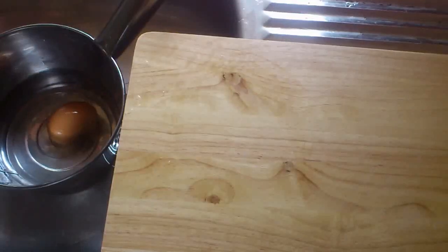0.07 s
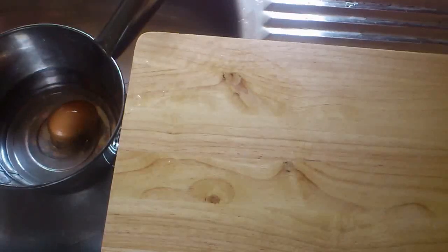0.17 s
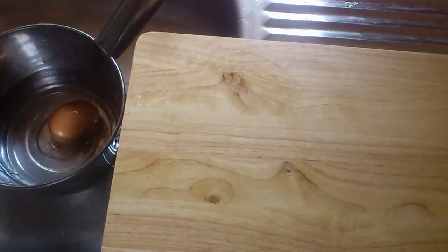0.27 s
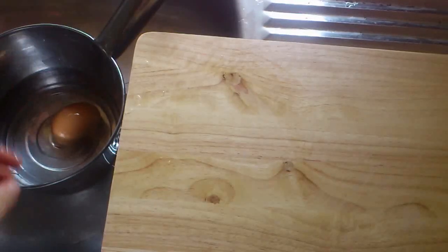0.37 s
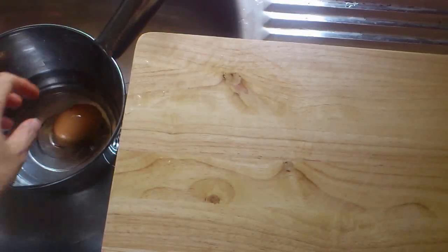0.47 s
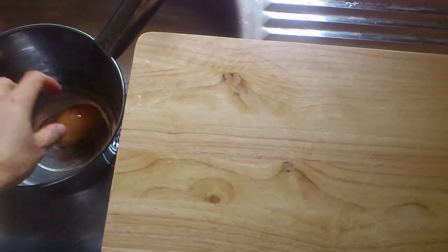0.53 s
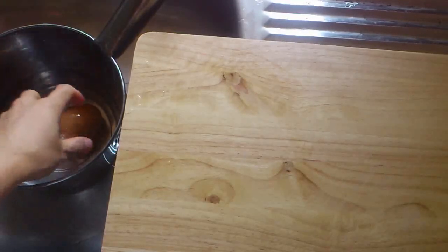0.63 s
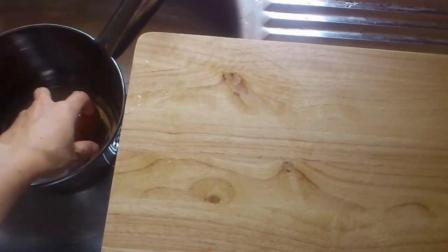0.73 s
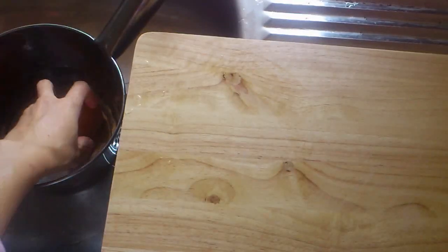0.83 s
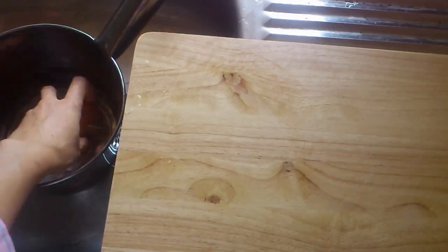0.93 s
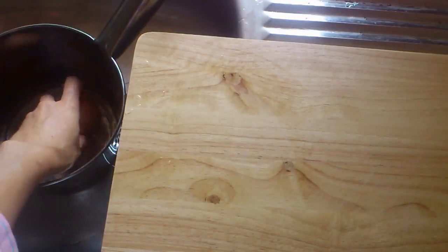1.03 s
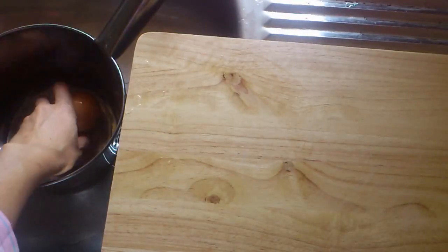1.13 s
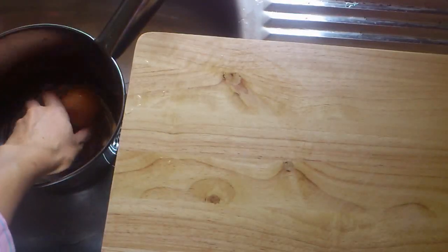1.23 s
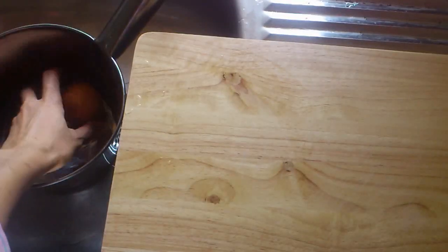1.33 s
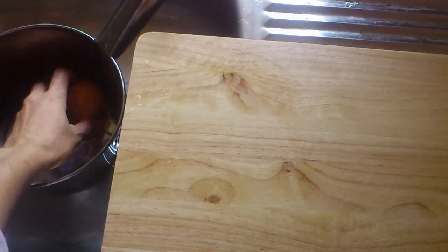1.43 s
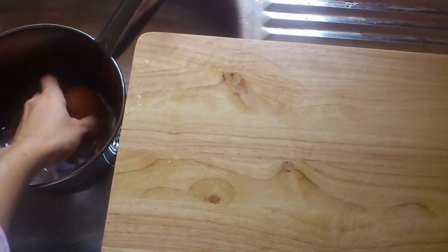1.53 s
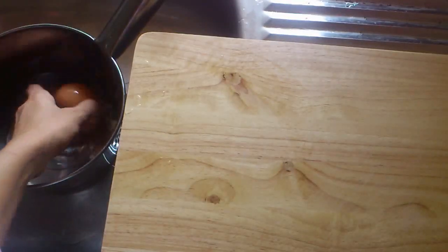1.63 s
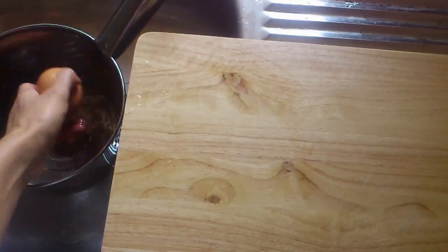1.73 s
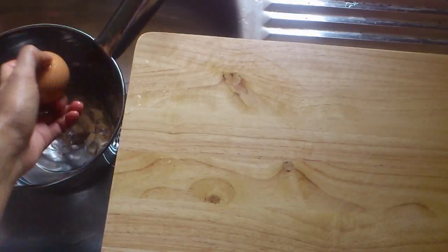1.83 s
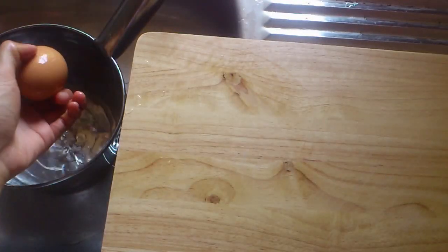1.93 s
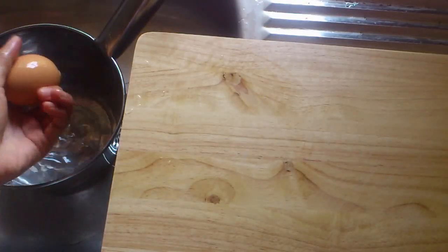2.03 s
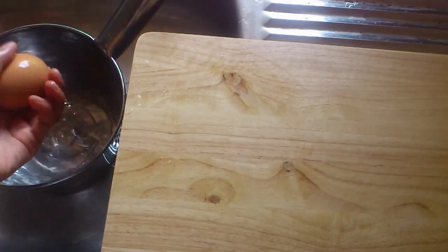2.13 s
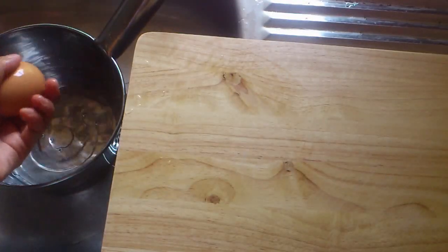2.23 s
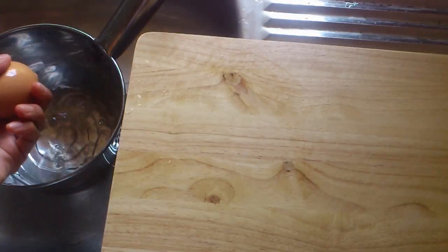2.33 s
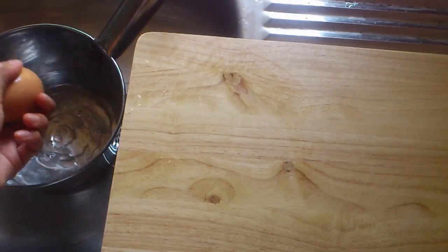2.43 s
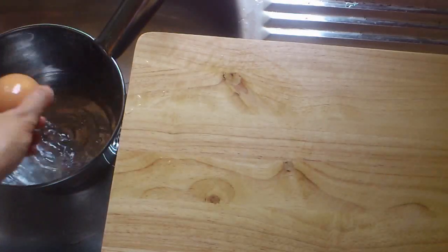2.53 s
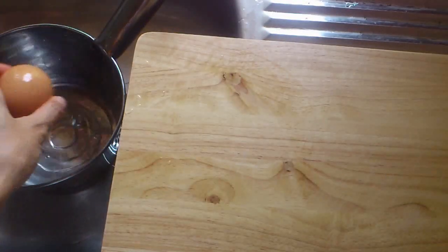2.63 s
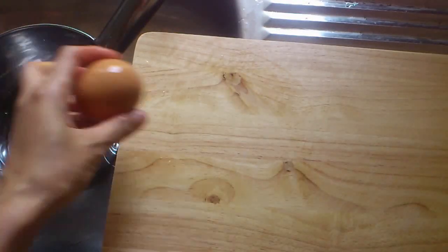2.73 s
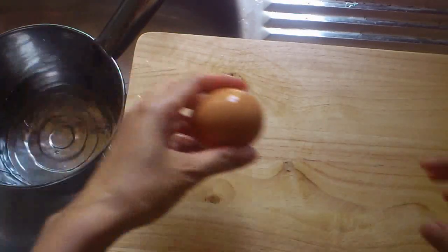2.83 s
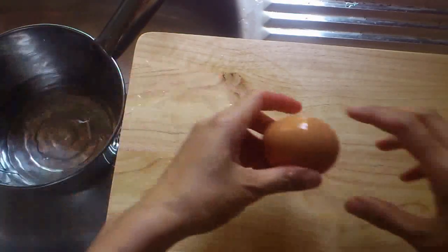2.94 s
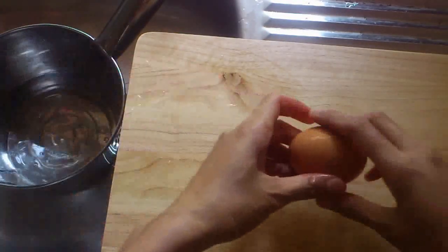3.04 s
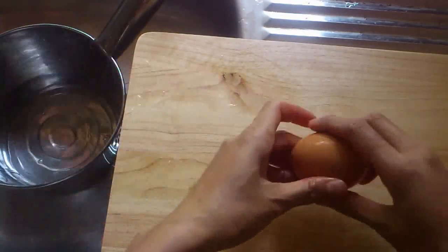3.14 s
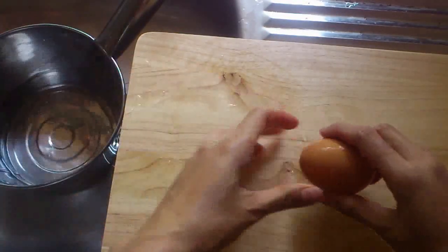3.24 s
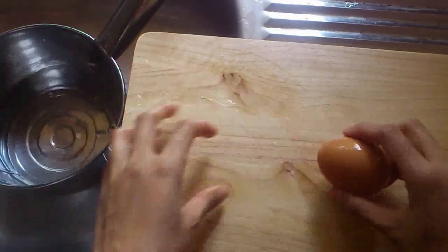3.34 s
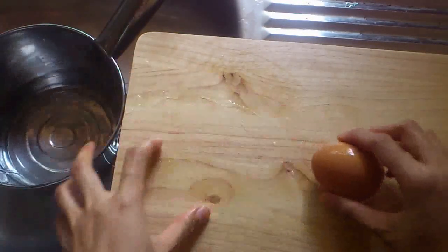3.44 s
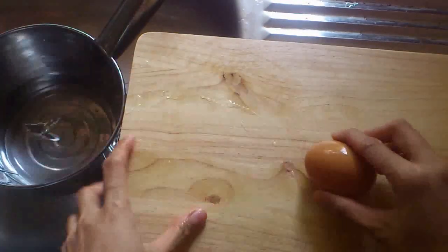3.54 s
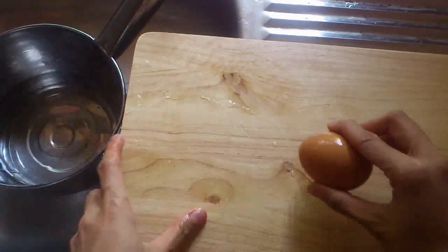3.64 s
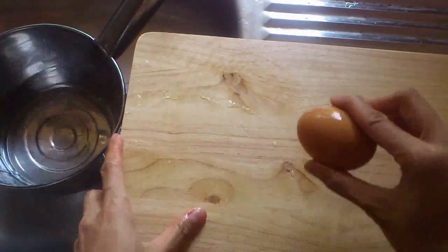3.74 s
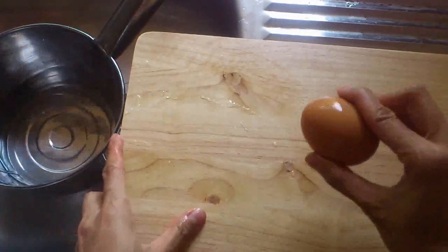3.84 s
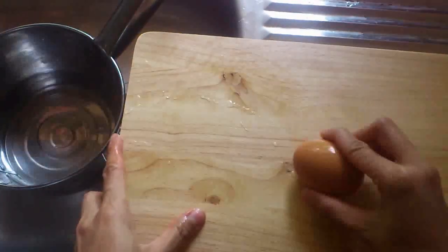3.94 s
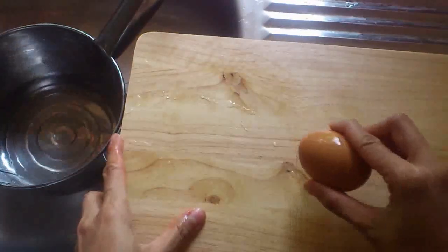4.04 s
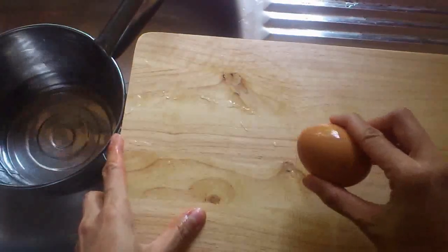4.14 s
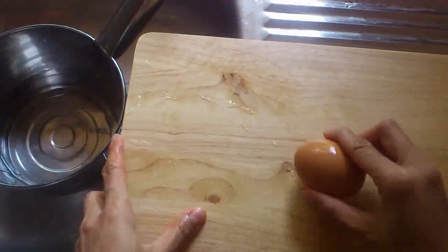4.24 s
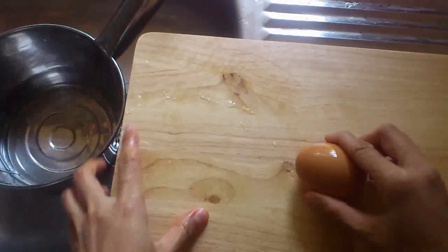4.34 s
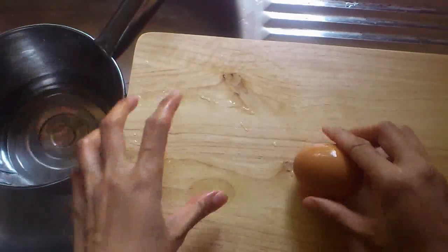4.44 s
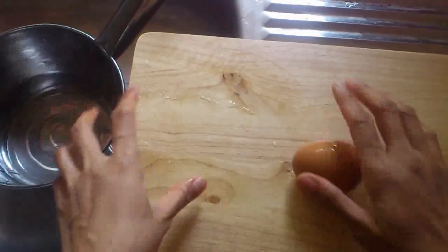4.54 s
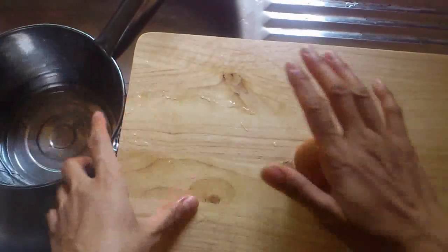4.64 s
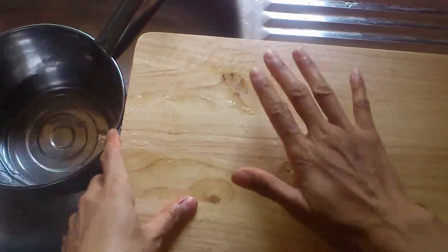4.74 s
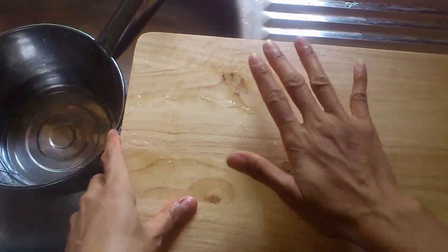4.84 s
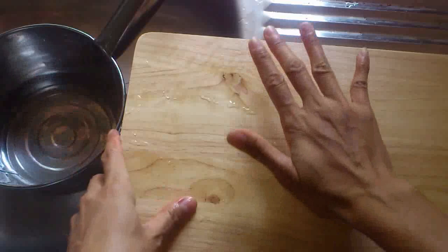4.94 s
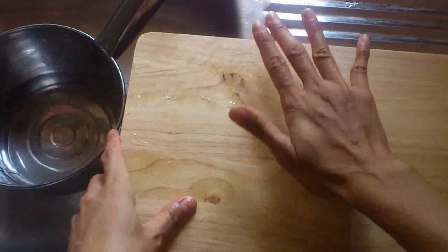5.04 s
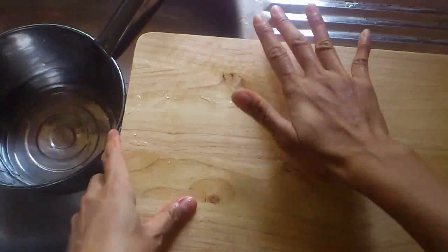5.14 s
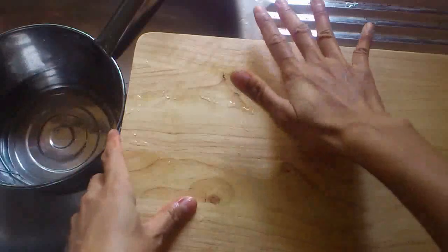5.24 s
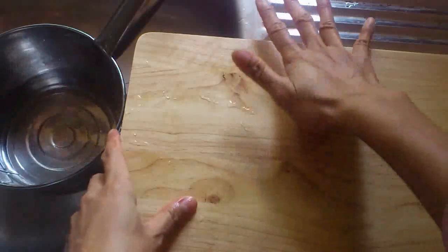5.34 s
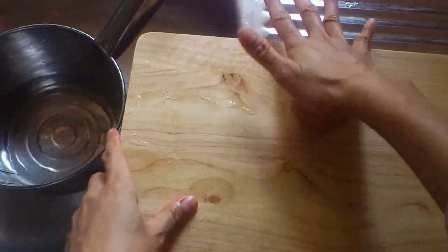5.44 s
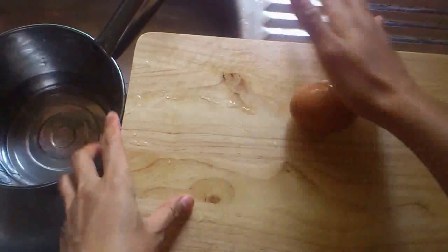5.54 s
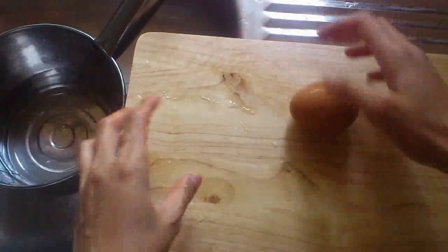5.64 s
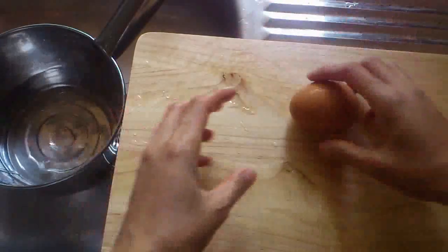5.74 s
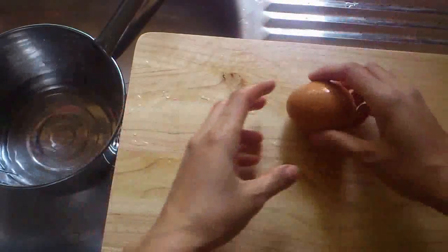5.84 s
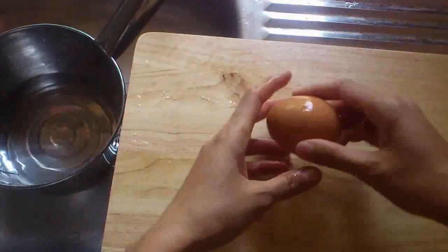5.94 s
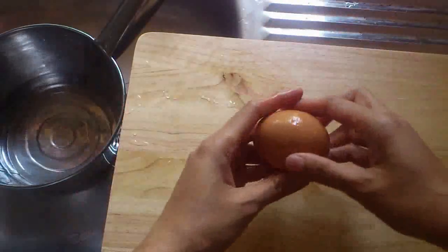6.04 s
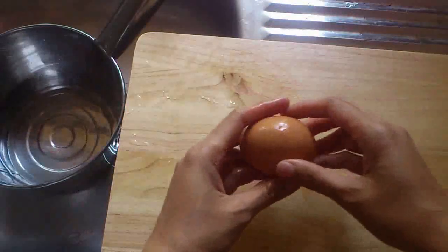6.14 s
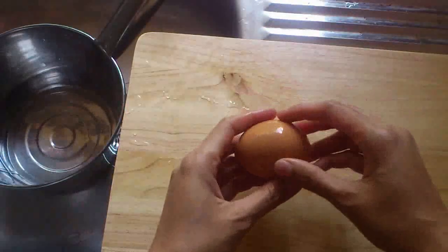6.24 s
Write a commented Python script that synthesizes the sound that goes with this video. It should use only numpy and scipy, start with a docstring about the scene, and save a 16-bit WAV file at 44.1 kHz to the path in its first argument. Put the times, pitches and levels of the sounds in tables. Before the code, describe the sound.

After a brief initial silence, a dry click on the right at 0.15 s opens low room rumble and gentle hiss, with a sleeve brushing until 0.35 s and briefly again near 0.6. From 0.8 to 2.0 s an egg faintly bumps a steel pot at left, water stirs quietly, and tiny bright wet ticks and bubbly drips follow, clearest at 1.4 and 2.0-2.3. Quiet until a dull thud on a wooden board at 3.55. A loud, sharp cracking knock lands at 4.0, a smaller double tap at 4.4, a faint touch at 4.8. From 5.1 to 5.5 the palm rolls the egg: dense, brittle crunching and snapping over a low worktop hum that dies slowly, with short room reverberation. Near 5.85 fingers drag lightly, with a soft low bump; a few wet ticks follow until 6.05. Distant hoarse rising chirps sound at 5.75, 6.0 and 6.25.

```python
"""A sleeve brushes past and a finger leaves the camera with dry clicks: shaped noise over air rumble and hiss.
An egg knocks its steel pot (ringing modes), stirs the water and drips: noise ticks and rising bubble tones.
It is tapped on a wooden board (force pulses into modes), then rolled under the palm: random grit crunches the shell.
The worktop booms and a small kitchen answers in dying noise. At the end a far bird chirps in hoarse pitch glides
while fingers drag over shell and wood, a last soft low bump is heard and a few wet ticks follow."""
import sys
import numpy as np
from scipy import signal
from scipy.fft import rfft, irfft, next_fast_len
from scipy.io import wavfile
from scipy.ndimage import uniform_filter1d, map_coordinates

SR = 44100
rng = np.random.default_rng(int(sys.argv[2]) if len(sys.argv) > 2 else 0)


def store_pcm(level_fs):
    """Save levels as 16-bit WAV."""
    pcm = np.round(np.clip(level_fs, -1, 1) * 32767).astype(np.int16)
    wavfile.write(sys.argv[1], SR, np.atleast_2d(pcm).T)


N = 277389
T = np.arange(N) / SR

# main swing of the worktop: mode_hz, t60_s
WORKTOP_SWING = (52, .75)
# decay of the room's answer: freq_hz, t60_s
KITCHEN_DECAY = [(100, 1), (500, 0.3), (2000, 0.24), (6000, 0.18), (14000, 0.098)]


def amp(db):
    """Decibels to linear gain."""
    return 10 ** (np.asarray(db) / 20)


def unit(x):
    """Scaled to rms 1."""
    return x / np.sqrt(np.mean(x ** 2) + 1e-20)


def along(points, hz):
    """Interpolate (Hz, value) points on a log frequency axis."""
    f, v = np.transpose(points)
    return np.interp(np.log(hz + 1), np.log(f + 1), v)


def gains(rows):
    """dB columns as gains per sample, -140 dB outside the table."""
    s, *cols = np.transpose(rows)
    return [amp(np.interp(T, s, c, -140, -140)) for c in cols]


def filtered(x, response):
    """x times a complex response of frequency, padded by 1 s."""
    m = next_fast_len(x.shape[-1] + SR)
    spectrum = rfft(x, m) * response(np.fft.rfftfreq(m, 1 / SR))
    return irfft(spectrum, m)[..., :x.shape[-1]]


def modes(hz, width_hz, db):
    """Response of causal resonances of alternating sign, each ringing from level db."""
    def response(f):
        total = 0
        for k, (c, w, g) in enumerate(zip(hz, width_hz, db)):
            resonance = SR * c / (c * c - f * f + 1j * f * w) / (2 * np.pi)
            total = total + (-1) ** k * amp(g) * resonance
        return total
    return response


def struck(table):
    """Response of (Hz, dB, t60 s) modes; width follows from decay."""
    hz, db, t60_s = np.transpose(table)
    return modes(hz, np.log(1000) / np.pi / t60_s, db)


def add(track, s, sound):
    """Mix a sound in at s seconds."""
    part = track[..., round(s * SR):round(s * SR) + sound.shape[-1]]
    part += sound[..., :part.shape[-1]]


def burst(t60_s, attack_s=0.00013):
    """A dying puff of white noise, 0.2 s long."""
    t = np.arange(SR // 5) / SR
    return rng.standard_normal(len(t)) * amp(-60 * t / t60_s) * (1 - np.exp(-t / attack_s))


def grit(rate_hz, spread_db):
    """Random clicks, the sizes more uneven with spread, rms 1."""
    u = rng.random((3, N))
    hits = u[0] < rate_hz / SR
    size = amp(-spread_db * np.log(u[1] + 1e-4))
    return unit(hits * size * np.sign(u[2] - .5))


def wobble(rate_hz):
    """A smooth random curve."""
    return map_coordinates(rng.standard_normal(int(N * rate_hz / SR) + 4), [T * rate_hz])


def sided(pair, balance):
    """Tilt left against right by frequency; gains sum to 2."""
    def response(hz):
        left = 1 / (1 + amp(-along(balance, hz)))
        return 2 * np.array([left, 1 - left])
    return filtered(pair, response)


def paired(pair, alike):
    """Two unrelated signals blended to a left-right likeness."""
    def response(hz):
        turn = np.arccos(np.clip(along(alike, hz), -1, 1)) / 2
        return np.array([np.cos(turn), np.sin(turn)])
    mid, side = filtered(pair, response)
    return np.array([mid + side, mid - side])


def panned(puff, peak_db, pan_db):
    """Stereo puff; peak_db is the mean of both sides, pan_db is left over right."""
    return amp(peak_db) * puff / np.abs(puff).max() * 2 / (1 + amp([[-pan_db], [pan_db]]))


def rush(spectrum):
    """Stereo noise of rms 1 with a given spectrum."""
    # freq_hz, left_right_likeness
    likeness = [(60, 0.95), (130, 0.3), (300, 0.53), (640, 0.24), (1400, 0.13), (3000, 0.058)]
    # freq_hz, left_over_right_db
    balance = [(60, 0), (180, 0.5), (550, 1), (1650, 0), (4970, 1), (15000, 9)]
    noise = filtered(rng.standard_normal((2, N)), lambda hz: amp(along(spectrum, hz)))
    return unit(sided(paired(noise, likeness), balance))


def egg_on_board():
    """Blows and the rolling egg push the board and the worktop; the breaking shell adds its crackle."""
    # egg or hand meets board: start_s, thud_db, knock_db, crack_db, boom_db
    taps = [(3.469, -61, -51.5, -49, -62), (3.559, -21.5, -26.5, -39, -41.5),
            (4.013, -24.5, -8.5, -6.5, -31.5), (4.181, -54, -41.5, -43, -77),
            (4.3695, -32, -30.5, -24, -33.5), (4.4, -34, -34, -61, -56), (4.824, -48.5, -48, -38.5, -49.5),
            (5.05, -65, -53, -42.5, -70)]
    # larger pieces snap: start_s, crack_db, jolt_db
    snaps = [(5.0989, -17, -63), (5.1262, -20, -46), (5.137, -16, -40.5), (5.1715, -20, -38),
             (5.2039, -18, -34), (5.2122, -13.5, -39.5), (5.241, -15, -40.5), (5.2975, -25, -38),
             (5.313, -18, -37.5), (5.3342, -16.5, -42.5), (5.3966, -18, -45), (5.4041, -19.5, -41.5),
             (5.4259, -45, -46.5), (5.448, -30, -58), (5.4798, -34, -49), (5.5109, -22, -43.5)]
    # palm rolls the egg: time_s, push_db
    roll = [(5.02, -69), (5.098, -62), (5.106, -45), (5.182, -34.5), (5.388, -46), (5.412, -38),
            (5.458, -53), (5.524, -43.5), (5.64, -99)]
    # breaking-shell spectrum: freq_hz, relative_db
    shell_spectrum = [(1470, -12), (2500, -0.5), (3420, -0.5), (4460, 0), (6850, -4), (9150, 0),
                      (15100, -15.5), (16200, -24.5)]
    # cracked-egg modes: mode_hz, relative_db, t60_s
    egg_modes = [(1705, 6, 0.012), (2180, -11, 0.041), (3430, -12, 0.012), (5500, -12, 0.014)]
    crackle_db, at_push_db, crackle_db_per_push_db = -34.5, -37.5, 1.1
    crushed_s, settle_db_per_s = 5.53, 401.5  # crackle dies away from here
    press_db, press_lag_s = 2.5, 0.1

    thuds, knocks, jolts, crackle, boom = np.zeros((5, N))
    for s, thud_db, knock_db, crack_db, boom_db in taps:
        chatter = amp(-22) * burst(0.025)  # board rattles on the worktop
        chatter[0] = 1
        add(thuds, s, amp(thud_db) * np.convolve(chatter, contact(0.22)))
        add(knocks, s, amp(knock_db) * np.convolve(chatter, contact(0.057)))
        snap_and_splinters = burst(0.023) + amp(-16) * burst(0.031)
        add(crackle, s, amp(crack_db) * snap_and_splinters)
        boom[round(s * SR)] += amp(boom_db)
    for s, crack_db, jolt_db in snaps:
        add(crackle, s, amp(crack_db) * burst(0.02, attack_s=0.0017))
        add(jolts, s, amp(jolt_db) * burst(0.024, attack_s=0.00095))

    push, = gains(roll)
    settle_db = settle_db_per_s * np.maximum(T - crushed_s, 0)
    fizz = amp(crackle_db - settle_db) * (push / amp(at_push_db)) ** crackle_db_per_push_db
    cushioned = np.convolve(amp(-24.5) * push * grit(800, spread_db=3.5), contact(0.37))  # soft palm
    thuds += cushioned[:N]
    knocks += amp(-31.5) * push * grit(910, spread_db=1.5)
    jolts += amp(-34.5) * fizz * grit(600, spread_db=4)
    crackle += fizz * amp(5.0 * wobble(70)) * grit(1800, spread_db=3.5)
    boom += amp(-42) * push * grit(300, spread_db=3)

    # steady pressure keeps the worktop swinging; it builds up and dies slowly
    lagged = filtered(push, lambda f: 1 / (1 + 2j * np.pi * f * press_lag_s))
    press = amp(press_db) * np.abs(lagged)
    hum = press * np.sin(2 * np.pi * WORKTOP_SWING[0] * T + 0.42 * wobble(8))

    shell_gain = amp(along(shell_spectrum, np.linspace(0, SR / 2, num=500)))
    shell = filtered(crackle, lambda f: amp(along(shell_spectrum, f))) / np.sqrt(np.mean(shell_gain ** 2))
    return board(thuds, knocks) + filtered(jolts, struck(egg_modes)) + shell, boom, hum


def contact(ms):
    """The force of one blow: the longer the contact, the duller."""
    t_ms = np.arange(100) / SR * 1000
    push = np.exp(-(t_ms / ms - 2) ** 2)
    return push / push.sum()


def board(thuds, knocks):
    """Flat thuds bend the whole board; pointed knocks also wake its upper modes."""
    # low modes: mode_hz, flat_thud_db, pointed_knock_db, t60_s
    low_modes = [(140, -34, -28, .1), (245, -23, -21, .06), (345, -9, -14, .05), (408, -6, -11, .11),
                 (500, -9, -13, .04), (596, 1, -11, .08), (745, 2, -9, .11)]
    # upper modes: mode_hz, relative_db
    upper_modes = [(1000, -4), (1285, 1.5), (1600, 2.5), (1900, 1), (2200, -0.5), (2800, -2), (3330, 0),
                   (3700, -4.5), (4200, -15), (4600, -7), (5100, -7.5), (5600, -5)]
    upper_t60_s = .018
    flat = [(hz, db, t60_s) for hz, db, _, t60_s in low_modes]
    pointed = [(hz, db, t60_s) for hz, _, db, t60_s in low_modes]
    pointed += [(hz, db, upper_t60_s) for hz, db in upper_modes]
    return filtered(thuds, struck(flat)) + filtered(knocks, struck(pointed))


def worktop(blows, hum):
    """Blows ring the worktop and the cupboard under it; the pressed hum is added."""
    # cupboard modes: mode_hz, relative_db, t60_s
    cupboard = [(78, -2, .2), (123, -2, 0.36)]
    hz, t60_s = WORKTOP_SWING
    return hum + filtered(blows, struck([(hz, 0, t60_s)] + cupboard))


def pot():
    """Bumps ring the steel pot's modes; each stirs the water, which laps the wall and settles."""
    # start_s, bump_db, worktop_boom_db
    bumps = [(0.798, -54.5, -34), (1.082, -58, -62), (1.245, -72, -66), (1.678, -68, -67),
             (1.995, -70, -73), (5.846, -62.5, -63)]
    # mode_hz, width_hz, relative_db
    steel_modes = [(125, 65, 11), (133.8, 12.2, 9), (252, 29, 7.5), (330, 46, 9.5), (400, 26, 6.5),
                   (605, 190, 13), (1160, 53, 2), (1355, 60, -4), (2000, 100, -27)]
    knock_db, slosh_db, slosh_t60_s = -20, -1, 0.99  # levels relative to the bump
    force, boom, stir = np.zeros((3, N))
    for s, db, boom_db in bumps:
        add(force, s, amp(db + knock_db) * burst(0.061, attack_s=0.00084))
        boom[round(s * SR)] += amp(boom_db)
        stir += (T > s) * amp(db + slosh_db - 60 * np.abs(T - s) / slosh_t60_s)
    ring = modes(*np.transpose(steel_modes))
    lapping = unit(filtered(grit(300, spread_db=3.5), ring))
    return filtered(force, ring) + stir * lapping, boom


def ticks():
    """Wet ticks of drops and fingers: panned noise bands; the higher, the shorter and narrower."""
    # start_s, peak_db, centre_hz, pan_db (left over right)
    splats = [(0.5753, -45, 3070, 1), (0.6, -58, 3400, 4), (0.809, -46.5, 2430, 15), (1.08, -51, 2270, 15),
              (1.185, -44.5, 7550, 22), (1.248, -46.5, 1520, 16), (1.4156, -32, 9050, 16),
              (1.431, -46.5, 2300, 7), (1.551, -44.5, 9200, 18), (1.63, -49, 9600, 7),
              (1.9949, -38.5, 9500, 14), (1.997, -41.5, 2020, 23), (2.047, -32, 7600, 14),
              (2.066, -48, 5950, 10), (2.1966, -29.5, 9600, 16.5), (2.209, -40, 9500, -17),
              (2.297, -44, 4670, 14), (2.336, -41, 9550, 7), (2.7705, -49.5, 9100, 11),
              (5.9, -43.5, 9100, 16), (5.971, -44, 9000, 18), (6.052, -50, 9000, 20.5)]
    t60_cycles, sharp_per_khz = 170, 0.12
    out = np.zeros((2, N))
    for s, db, hz, pan_db in splats:
        def band(f):
            sharp = sharp_per_khz * hz / 1000
            return 1 / (1 + 1j * sharp * (f / hz - hz / (f + 1))) ** 2 / (1 + (f / 13000) ** 12)
        puff = filtered(burst(t60_cycles / hz), band)
        add(out, s, panned(puff, db, pan_db))
    return out


def plops():
    """Each drop entering the water traps a bubble whose pitch rises as it dies."""
    # start_s, peak_db, start_hz, rise_per_s, t60_s
    drops = [(1.246, -58, 1350, .3, .12), (1.247, -60, 1960, .3, .08), (1.8594, -41, 4950, .5, .012),
             (2.0657, -52, 3600, .5, .03), (2.299, -42, 1280, .5, .09), (2.303, -41, 1350, 8, .06),
             (2.314, -44, 1600, 3, .05)]
    out, t = np.zeros(N), np.arange(SR // 8) / SR
    for s, db, hz, rise, t60_s in drops:
        envelope = amp(db - 60 * t / t60_s) * (1 - np.exp(-t / 0.0003))
        add(out, s, envelope * np.sin(2 * np.pi * hz * (t + rise * t * t)))
    return out


def fingers():
    """Fingers take the egg off the board: skin drags over shell and wood, swells and lets go."""
    # peak_db, rise_db_per_s, fall_db_per_s
    swell = (-55, 150, 330)
    peak_s = 5.868

    def bands(f):
        return sum(g / (1 + 1j * 5 * (f / hz - hz / (f + 1)))
                   for hz, g in [(2000, 2.1), (2900, 0.67), (3800, 0.55)])
    db, rise, fall = swell
    level = amp(db - np.maximum(rise * (peak_s - T), fall * (T - peak_s)))
    return level * unit(filtered(grit(500, spread_db=0.0), bands))


def button():
    """A finger leaves the camera: dry broad clicks on its body."""
    # start_s, peak_db, pan_db (left over right)
    clicks = [(0.1484, -20.5, -22), (0.197, -38, 2)]
    out = np.zeros((2, N))
    for s, db, pan_db in clicks:
        puff = filtered(burst(0.015), lambda f: 1j * f / (700 + 1j * f) / (1 + 1j * f / 4000))
        add(out, s, panned(puff, db, pan_db))
    return out


def sleeve():
    """Each brush of cloth slides between two levels, then fades."""
    # from_s, to_s, first_db, last_db
    brushes = [(0.124, 0.336, -47, -54), (0.565, 0.6, -56, -57)]
    # freq_hz, relative_db
    cloth = [(300, -4), (1000, -6), (3000, -5), (9000, -0.5), (14000, -10.5), (14600, -60)]
    fall_db_per_s = 352
    level = 0
    for start_s, end_s, first_db, last_db in brushes:
        slide_db = np.interp(T, [start_s, end_s], [first_db, last_db])
        level = level + (T > start_s) * amp(slide_db - fall_db_per_s * np.maximum(T - end_s, 0))
    return level * rush(cloth)


def bird():
    """Far rising whistles that level off, roughened by a fast random gain."""
    # start_s, end_hz, level_db (before shaping)
    chirps = [(5.735, 3520, -53.5), (5.989, 3450, -48.5), (6.223, 3750, -43)]
    length_s, from_hz = .035, 2200
    out, u = np.zeros(N), np.arange(round(length_s * SR)) / (length_s * SR)
    for s, to_hz, db in chirps:
        pitch_hz = from_hz + (to_hz - from_hz) * np.sin(np.pi / 2 * u)
        envelope = amp(db) * 2 * u * u * np.sin(np.pi * u)
        add(out, s, envelope * np.sin(2 * np.pi * np.cumsum(pitch_hz) / SR))
    return out * (.2 + wobble(900))


def kitchen(x):
    """Each frequency of the room's answer dies at its own speed; the noise tail is drawn anew every 0.2 s."""
    # freq_hz, left_right_likeness
    likeness = [(100, 0.94), (400, 1), (1000, 0.13), (3000, 0.42)]
    split_hz = 2400  # diffuse above
    out, size = np.zeros((2, N)), SR // 5
    for start in range(0, N, size):
        hz, t, z = signal.stft(rng.standard_normal((2, SR // 2)), SR, nperseg=256)
        decay = amp(-60 * t / along(KITCHEN_DECAY, hz)[:, None])
        tail = signal.istft(z * decay, SR, nperseg=256)[1]
        echo = signal.fftconvolve(x[None, start:start + size], tail / np.linalg.norm(tail[0]), axes=1)
        add(out, start / SR + .002, echo)
    low = lambda f: 1 / (1 + (f / split_hz) ** 6)
    diffuse = filtered(scatter(x), lambda f: np.sqrt(1 - low(f) ** 2))
    return paired(filtered(out, low) + diffuse, likeness)


def scatter(x):
    """The walls scatter: noise follows the sound's smoothed spectrum and dies band by band."""
    hz, t, z = signal.stft(x, SR, nperseg=256, noverlap=192)
    power = uniform_filter1d(np.abs(z) ** 2, size=4, axis=0)
    keep = amp(-120 * t[1] / along(KITCHEN_DECAY, hz))  # power kept per frame
    stored = np.array([signal.lfilter([0, 0, 1 - k], [1, -k], p) for k, p in zip(keep, power)])
    noise = signal.stft(rng.standard_normal((2, N)), nperseg=256, noverlap=192)[2]
    shaped = noise / np.std(noise) * np.sqrt(np.abs(stored))
    return signal.istft(shaped, nperseg=256, noverlap=192)[1][:, :N]


def steady_air():
    """Slowly varying low room rumble and nearly steady camera hiss, both shaped noise."""
    # time_s, rumble_db
    rumble_level = [(.14, -50), (.7, -58), (1.3, -56), (2.4, -56), (3.3, -60), (4.7, -56.5), (5.8, -57),
                    (6.29, -53.5)]
    # freq_hz, relative_db
    rumble_spectrum = [(7.1, -35.5), (12, -12), (49, 1.5), (62, -2.5), (97, -12), (161, -20.5), (198, -27),
                       (300, -22.5), (390, -61), (660, -120)]
    # freq_hz, relative_db
    hiss_spectrum = [(90, -52.5), (150, -7.5), (220, -8.5), (600, -15.5), (1100, -15.5), (3000, -20),
                     (9500, -22.5), (13500, -27.5), (13800, -69.5), (14500, -120)]
    hiss_db = -59.5
    rumble = gains(rumble_level)[0] * amp(0.5 * wobble(4.0)) * rush(rumble_spectrum)
    return rumble + amp(hiss_db + 0.067 * wobble(9)) * rush(hiss_spectrum)


def scene():
    """Near sources and their room, the worktop's boom and the steady air."""
    # the right port is shaded in the treble: freq_hz, left_over_right_db
    port_balance = [(60, -7), (110, -1.5), (200, 3), (380, 0), (700, -0.5), (1290, 1), (2380, 3.5),
                    (4400, 1), (8120, 16.5), (15000, 18.5)]
    left_lead_ms = 0.057  # the ports lie apart
    egg, blows, hum = egg_on_board()
    steel, bumps = pot()
    near, wet, far = egg + steel + fingers(), ticks() + plops(), bird()
    room = kitchen(amp(-2) * near + amp(-2) * wet[0] + amp(-2.5) * far)
    ports = filtered(near + room, lambda f: np.exp(1j * np.pi * left_lead_ms / 1000 * f * [[1], [-1]]))
    boom = worktop(blows + bumps, hum)
    return sided(ports, port_balance) + wet + amp(1.5) * far + boom + steady_air() + sleeve() + button()


def record(dry):
    """Sound opens over 2 ms after a short silence; peaks are rounded off and the top is cut steeply."""
    start_s, ceiling, top_hz = 0.1335, .93, 16200
    started = dry * np.clip((T - start_s) / 0.002, 0, 1)
    rounded = started / (1 + np.abs(started / ceiling) ** 6) ** (1 / 6)
    return filtered(rounded, lambda hz: 1 / (1 + (hz / top_hz) ** 100))


dry = scene()
out = record(dry)
store_pcm(out)
```